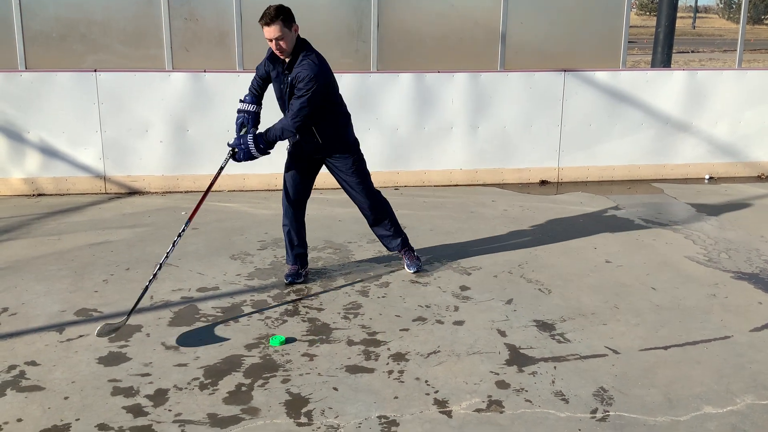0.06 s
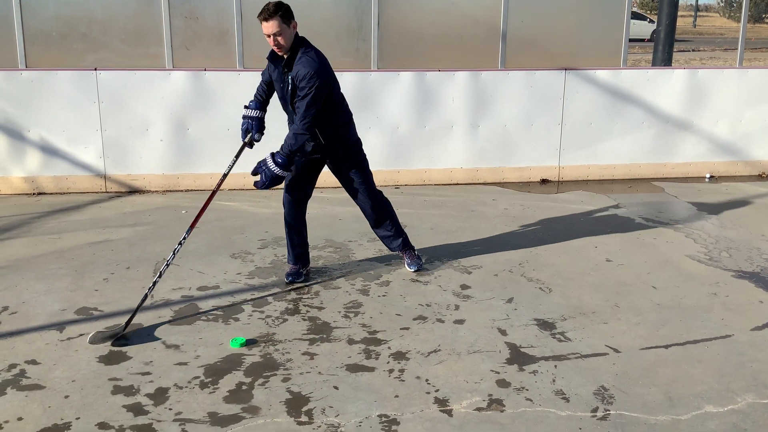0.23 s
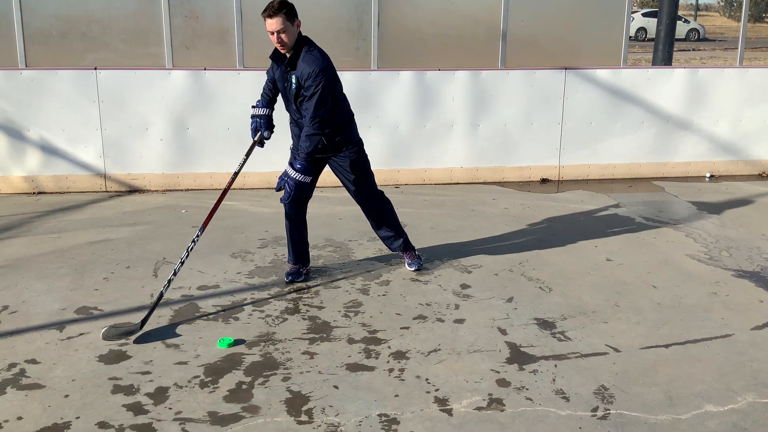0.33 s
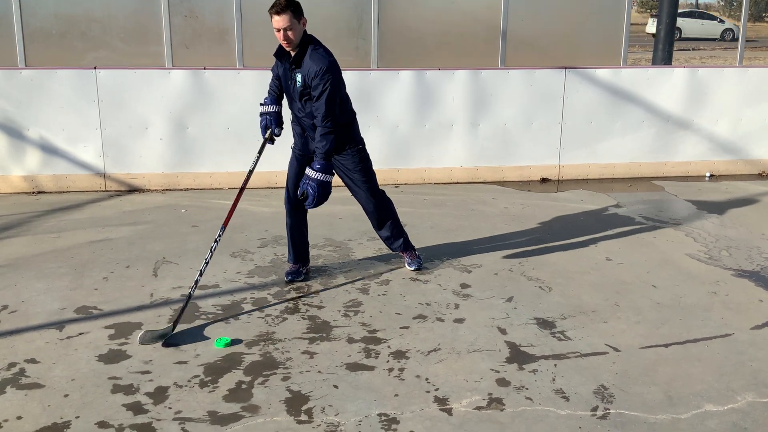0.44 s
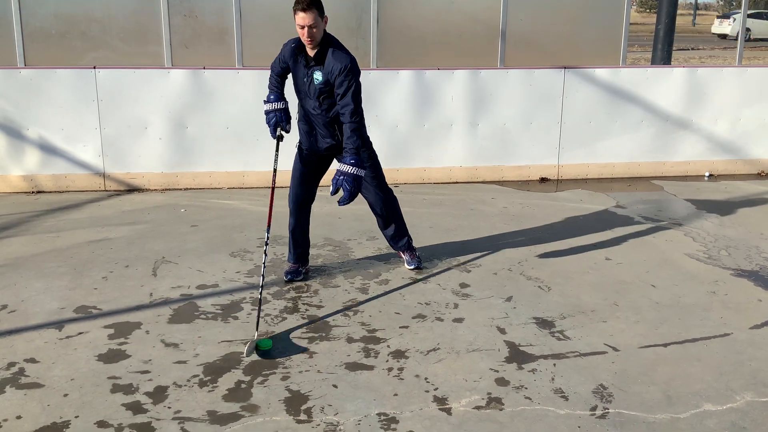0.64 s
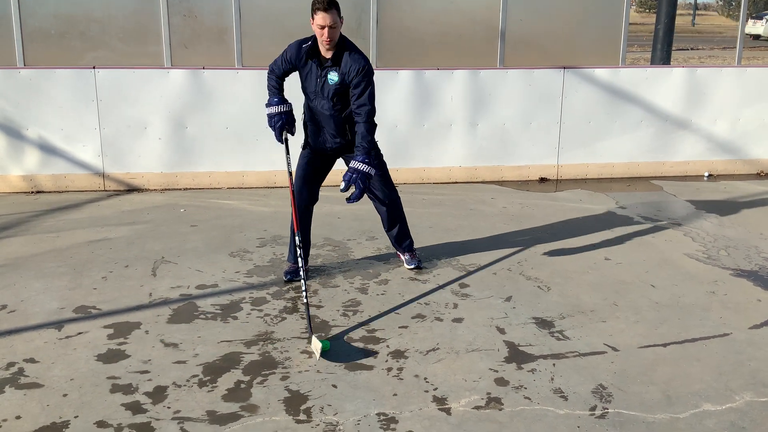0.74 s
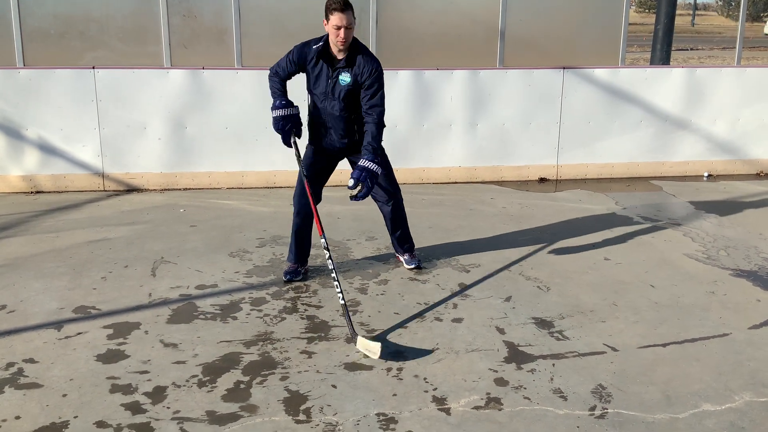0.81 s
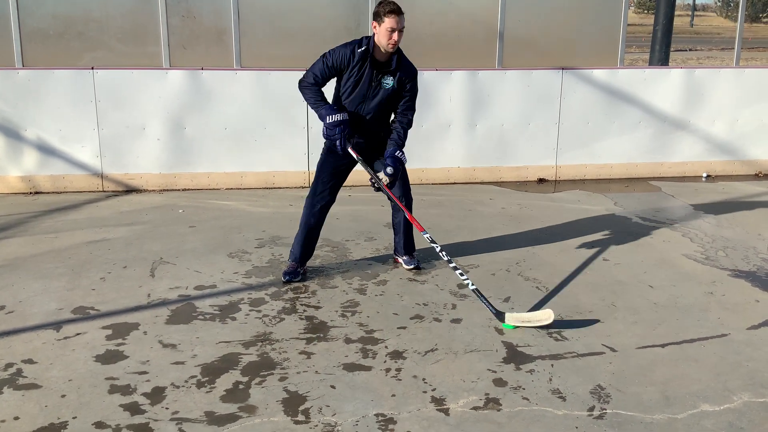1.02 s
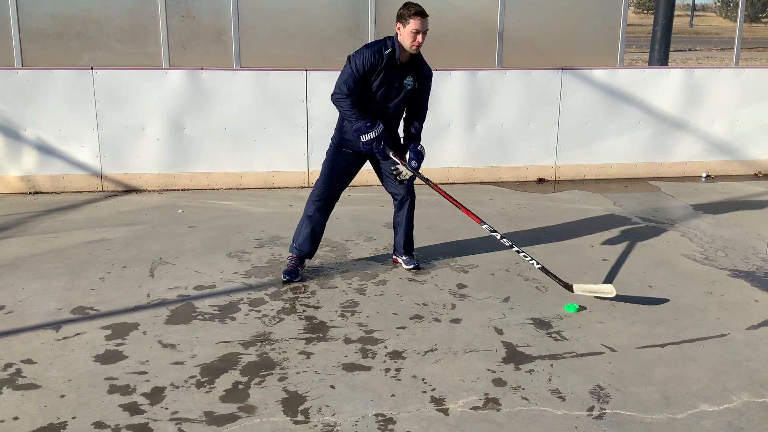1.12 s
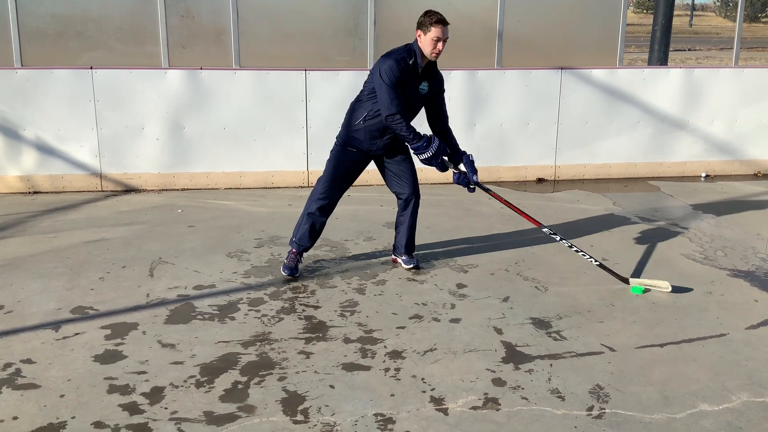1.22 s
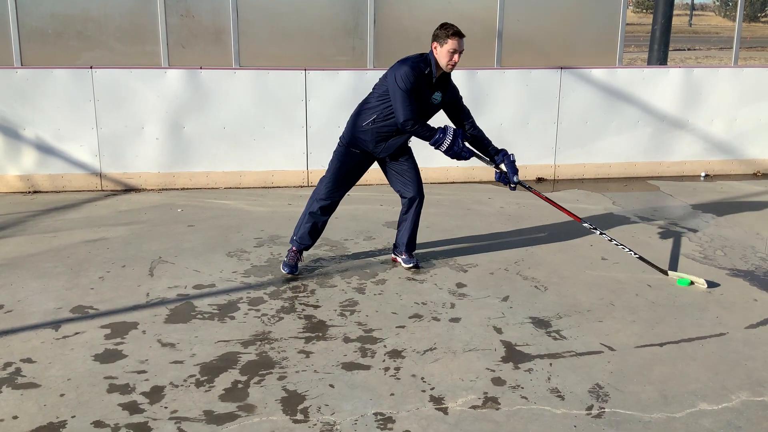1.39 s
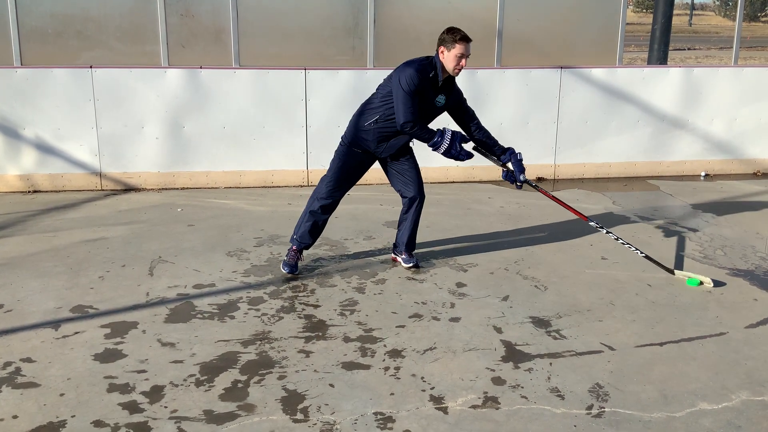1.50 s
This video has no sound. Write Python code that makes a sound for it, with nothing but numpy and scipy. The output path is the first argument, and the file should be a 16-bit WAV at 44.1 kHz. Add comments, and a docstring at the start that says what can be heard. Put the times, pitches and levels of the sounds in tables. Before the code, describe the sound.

Dry, short hockey stick taps on an outdoor concrete rink, with light touches and brief scraping

```python
"""Hockey stick on an outdoor rink

A hockey stick taps the concrete and a plastic ball, then drags the ball across.
Each tap rings the blade briefly and crushes grit; the boards slap it back and the rink rings on faintly.
The sliding blade scrapes as a run of tiny grain catches. A distant rumble and a soft hiss lie underneath.
The ringing is built from fading sine waves, the rest mostly from coloured noise.
The right microphone hears the treble a little earlier."""
import sys
import numpy as np
from scipy import signal
from scipy.fft import rfft, irfft, next_fast_len
from scipy.io import wavfile

SR = 44100
rng = np.random.default_rng(int(sys.argv[2]) if len(sys.argv) > 2 else 0)


def log_audio(samples):
    """Write samples as a 16-bit WAV file to the path given in sys.argv[1]."""
    # one column per channel
    frames = np.atleast_2d(samples).T
    # limit to full scale, then quantise
    limited = np.clip(frames, -1, 1)
    pcm = np.round(limited * 32767).astype(np.int16)
    wavfile.write(sys.argv[1], SR, pcm)


N = 68355  # length of the scene in samples


def amp(db):
    """Turn decibels into a gain."""
    return 10 ** (np.asarray(db) / 20)


def unit(x):
    """Scale a sound to an average (rms) strength of 1."""
    return x / np.sqrt(np.mean(x ** 2) + 1e-20)


def along(points, hz):
    """Read a curve of (pitch_hz, value) points, spacing pitch by ratio as the ear does."""
    point_hz, value = np.transpose(points)
    return np.interp(np.log(hz + 1), np.log(point_hz + 1), value)


def curve(points):
    """Turn (time_s, value) points into one value per sample."""
    return np.interp(np.arange(N) / SR, *np.transpose(points))


def filtered(x, response):
    """Change the strength or phase of each pitch by a given response."""
    size = x.shape[-1]
    padded = next_fast_len(size + SR // 8)  # spare room keeps the end from wrapping onto the start
    spectrum = rfft(x, padded) * response(np.fft.rfftfreq(padded, 1 / SR))
    return irfft(spectrum, padded)[..., :size]


def cut(x, hz, kind, order):
    """Remove the pitches above ("low") or below ("high") a limit."""
    sections = signal.butter(order, min(hz, SR / 3), kind, fs=SR, output="sos")
    return signal.sosfilt(sections, x)


def noise(size, colour, alike):
    """Coloured stereo noise of rms 1: more shared "mid" makes left and right more alike."""
    def mid_and_side(hz):
        turn = np.arccos(np.clip(along(alike, hz), -1, 1)) / 2
        return amp(along(colour, hz)) * [np.cos(turn), np.sin(turn)]

    mid, side = filtered(rng.standard_normal((2, size)), mid_and_side)
    return unit(np.array([mid + side, mid - side]))


def add(track, start_s, sound):
    """Mix a sound into the track from its start time."""
    part = track[:, max(round(start_s * SR), 0):][:, :sound.shape[-1]]
    part += sound[..., :part.shape[-1]]


# colour of the distant rumble: pitch_hz, level_db
RUMBLE_COLOUR = [(25, -3), (70, -3), (180, -4.5), (400, -14.5), (540, -9.5), (680, -19.5), (1000, -16),
                 (1500, -31), (2300, -28), (3500, -44.5), (7000, -58)]
# loudness of the rumble over time: time_s, level_db
RUMBLE_LEVEL = [(.35, -46.5), (.75, -47.5)]
# how alike the rumble is left and right: pitch_hz, likeness (1 = identical)
RUMBLE_ALIKE = [(60, 1), (200, 1), (600, 0.83), (2000, 0.48)]
# colour of the soft hiss: pitch_hz, level_db
HISS_COLOUR = [(1500, 4.5), (3500, -3), (5300, 3.5), (6200, 0.5), (7300, -8.5), (8900, 6.5), (10200, -4.5),
               (11500, -4), (12900, 7.5), (14500, -12), (16000, -32)]
# rise and fall of the hiss, before a fixed lift: time_s, level_db
HISS_LEVEL = [(0.0, -58), (0.098, -53.5), (0.254, -57.5), (0.478, -78), (0.604, -48), (0.672, -51.5),
              (1.04, -55.5), (1.216, -48.5), (1.308, -51.5), (1.446, -55), (1.55, -70)]
HISS_LIFT_DB = 1.5


def outdoors():
    """Noise shaped into a distant rumble and a soft hiss that swells and sinks."""
    rumble = amp(curve(RUMBLE_LEVEL)) * noise(N, RUMBLE_COLOUR, RUMBLE_ALIKE)
    hiss_alike = [(1000, 0.073)]  # one point: the same small likeness at every pitch
    hiss = amp(curve(HISS_LEVEL) + HISS_LIFT_DB) * noise(N, HISS_COLOUR, hiss_alike)
    return rumble + hiss


# colour of the bending wave in the blade: pitch_hz, level_db
FLEX_COLOUR = [(150, -2.5), (380, -28), (540, 3.5), (800, 1.5), (1300, -2), (2200, -13.5), (4000, -21)]
FLEX_FRONT_HZ = 1983  # this pitch and all above it arrive first
FLEX_DELAY_S = 0.0042  # lag of the pitch two octaves below the front


def flex(size):
    """A bending pulse of peak 1: low notes travel slower, so the knock sweeps downward."""
    hz = np.fft.rfftfreq(size, 1 / SR)
    delay_s = FLEX_DELAY_S * np.maximum(np.sqrt(FLEX_FRONT_HZ / np.maximum(hz, hz[1])) - 1, 0)
    phase = 2 * np.pi * np.cumsum(delay_s) * hz[1]  # adding up delay over pitch gives phase
    pulse = irfft(amp(along(FLEX_COLOUR, hz)) * np.exp(-1j * phase), size)
    return pulse / np.abs(pulse).max()


# ringing notes (modes) of blade and shaft: pitch_hz, level_db, fade_s (time to fall 60 dB, at ring length 1)
BLADE_MODES = [(350, -10.5, 0.032), (528.3, -5, 0.046), (647, -5.5, 0.035), (855, -7, 0.038),
               (1037, -1, 0.039), (1371, 1.5, 0.021), (1488, -9, 0.028), (1900, -7, 0.026),
               (2138, -1.5, 0.021), (2554, -3, 0.021), (2825, -6, 0.031), (3767, -1.5, 0.017),
               (5100, -1.5, 0.015)]
BUILD_CYCLES = 0.16  # low modes take longer to build up
MODE_SCATTER_RAD = 0.3  # random phase spread, separate for each microphone


def blade_ring(t, ring_length):
    """Each mode of the blade is a sine wave that builds up fast and dies away."""
    ring = np.zeros((2, len(t)))
    for k, (hz, level_db, fade_s) in enumerate(BLADE_MODES):
        phase = k * np.pi / 2 + rng.normal(0, MODE_SCATTER_RAD, (2, 1))
        loudness = amp(level_db - 60 * t / (fade_s * ring_length)) * (1 - np.exp(-t * hz / BUILD_CYCLES))
        ring += loudness * np.sin(2 * np.pi * hz * t + phase)
    return ring


# how alike contact sounds are left and right: pitch_hz, likeness (1 = identical)
CONTACT_ALIKE = [(500, 0.72), (2000, 0.9), (6000, 0.22)]
# colour of the dense ringing among the modes: pitch_hz, level_db
CLACK_COLOUR = [(300, -11), (750, 6), (2100, -0.5), (3200, 0.5), (9000, -12.5)]
CLACK_DB, CLACK_FADE_S = -2, 0.025  # fade is the time to fall 60 dB, at ring length 1
CLACK_ATTACK_S = 0.00019


def clack(t, ring_length):
    """Many close, quickly damped modes together sound like a burst of noise."""
    fade = amp(CLACK_DB - 60 * t / (CLACK_FADE_S * ring_length))
    return noise(len(t), CLACK_COLOUR, CONTACT_ALIKE) * fade * (1 - np.exp(-t / CLACK_ATTACK_S))


# colour of crushed grit: pitch_hz, level_db
GRIT_COLOUR = [(1500, -1.5), (3200, -1), (4900, 6), (6000, 0), (6800, 5), (7700, -1.5), (9300, 10.5),
               (10200, -19), (11000, 15.5), (11800, -24), (13100, 11), (15000, -3.5), (16500, -14)]
GRIT_RISE_S, GRIT_FALL_S = 0.00019, 0.0025
GRIT_CLUMP_DB, GRIT_CLUMP_S = 5, 0.0005  # unevenness, and how long each clump lasts


def grit(t):
    """Grit crushed under the blade: a very short crunch of uneven noise."""
    crush = (1 - np.exp(-t / GRIT_RISE_S)) ** 2 * np.exp(-t / GRIT_FALL_S)
    clump_gains = amp(GRIT_CLUMP_DB * np.clip(rng.standard_normal(len(t)), -2, 2))
    clumps = unit(clump_gains[(t / GRIT_CLUMP_S).astype(int)])
    return crush / crush.max() * clumps * noise(len(t), GRIT_COLOUR, CONTACT_ALIKE)


FAVOUR_DB, FAVOUR_Q = -3.5, 3.5  # extra weight near the favoured pitch, and its sharpness
MUTE_Q = 4  # sharpness of the muted notch


def blow(level_db, bright_hz, low_hz, favoured_hz, ring_length, grit_db, muted_hz=None, flex_db=None):
    """One contact rings and crunches; a firm tap also bends the blade and mutes modes still at that point."""
    t = np.arange(SR // 10) / SR
    body = blade_ring(t, ring_length) + clack(t, ring_length)
    if muted_hz:
        body = body + amp(flex_db) * flex(len(t))
        body = signal.lfilter(*signal.iirnotch(muted_hz, MUTE_Q, fs=SR), body)
    favoured = signal.lfilter(*signal.iirpeak(favoured_hz, FAVOUR_Q, fs=SR), body)
    body = body + amp(FAVOUR_DB) * favoured
    body = cut(body, bright_hz, "low", order=3)
    body = cut(body, low_hz, "high", order=1)
    return amp(level_db) * body + amp(grit_db) * grit(t)


# colour of the slap off the boards: pitch_hz, level_db
BOARDS_COLOUR = [(200, -2), (1500, 6), (4000, 11.5), (9000, -8.5), (15000, 13.5)]


def board_slap(tap):
    """The boards throw the tap back with a changed colour."""
    return filtered(tap, lambda hz: amp(along(BOARDS_COLOUR, hz)))


# how long the rink rings on: pitch_hz, fade_s (time to fall 60 dB)
RINK_FADE = [(4000, 0.99), (13000, 0.13)]
RINK_DB, RINK_BUILD_S = -14, 0.0022
SCATTER_DB, SCATTER_FADE_S = -5.5, 0.055  # fade is the time to fall 60 dB


def rink(sound):
    """Early scatter from the ground and a long faint tail between the boards."""
    # fading each pitch of a noise at its own speed makes the tail
    hz, frame_s, pieces = signal.stft(rng.standard_normal((2, SR)), SR, nperseg=256)
    fade = amp(-60 * frame_s / along(RINK_FADE, hz)[:, None])
    tail = signal.istft(pieces * fade, SR, nperseg=256)[1]
    t = np.arange(tail.shape[1]) / SR
    tail = unit(tail * (1 - np.exp(-t / RINK_BUILD_S)))
    scatter = unit(rng.standard_normal(tail.shape) * amp(-60 * t / SCATTER_FADE_S))
    echoes = (amp(RINK_DB) * tail + amp(SCATTER_DB) * scatter) / np.sqrt(len(t))
    return signal.fftconvolve(sound, echoes, axes=1)


# firm blade taps: start_s, level_db (of the ringing), bright_hz (treble limit), low_hz (bass limit),
# favoured_hz and muted_hz (at the point struck), ring_length (ratio), flex_db (beside the ringing),
# grit_db, echo_delay_s, echo_db and rink_db (both beside the tap)
TAPS = [(.2410, -20, 1200, 690, 945, 1282, 1.2, -13, -68, 0.018, -15.5, -5.5),
        (0.4173, -20, 2150, 650, 1000, 2390, 0.94, -4.5, -50.5, 0.02, -12, -3),
        (0.5516, -12, 2270, 850, 1220, 3170, 0.92, -7.5, -13.5, .0205, -15.5, -3.5),
        (1.1908, -21.5, 4900, 380, 1620, 1130, 0.84, -5.5, -33, 0.016, -10, 0.5),
        (1.2696, -14.5, 3030, 260, 1340, 3580, 0.7, 5.5, -20, 0.017, -19, -11)]
# light touches of ball and blade: start_s, level_db (of the ringing), bright_hz, favoured_hz, grit_db
TOUCHES = [(.563, -35, 3000, 1890, -35), (.620, -32.5, 1850, 1080, -43), (1.0009, -38, 5500, 1430, -36),
           (1.016, -38, 6500, 5460, -45), (1.033, -45.5, 5000, 3860, -41), (1.045, -44, 5000, 4020, -41),
           (1.2031, -30.5, 6160, 4770, -27), (1.312, -32, 1540, 590, -38.5),
           (1.477, -45, 3370, 1470, -50.5)]
TOUCH_LOW_SHARE, TOUCH_RING = 0.3, 0.89  # bass limit over favoured pitch; ring length ratio


def stick():
    """Taps with their slap off the boards and rink echo, and the lighter touches between them."""
    out = np.zeros((2, N))
    for (start_s, level_db, bright_hz, low_hz, favoured_hz, muted_hz, ring_length, flex_db,
         grit_db, echo_delay_s, echo_db, rink_db) in TAPS:
        tap = blow(level_db, bright_hz, low_hz, favoured_hz, ring_length, grit_db, muted_hz, flex_db)
        add(out, start_s, tap)
        add(out, start_s + echo_delay_s, amp(echo_db) * board_slap(tap))
        add(out, start_s, amp(rink_db) * rink(tap))
    for start_s, level_db, bright_hz, favoured_hz, grit_db in TOUCHES:
        low_hz = TOUCH_LOW_SHARE * favoured_hz
        add(out, start_s, blow(level_db, bright_hz, low_hz, favoured_hz, TOUCH_RING, grit_db))
    return out


# slides of the blade on concrete: start_s, length_s, level_db
SCRAPES = [(0.416, 0.14, -50.5), (1.003, 0.062, -51.5), (1.377, 0.078, -52)]
# colour of the scrape: pitch_hz, level_db
SCRAPE_COLOUR = [(400, -20), (2400, 14.5), (3200, 1.5), (4000, 7.5), (7500, 3.5), (16000, -8)]
GRAINS_PER_S, GRAIN_SPREAD_DB = 1200, 4


def scraping():
    """The sliding blade catches on sand grains of uneven size, each catch dying away like crushed grit."""
    out = np.zeros((2, N))
    t = np.arange(N) / SR
    grain_sizes = amp(GRAIN_SPREAD_DB * np.clip(rng.standard_normal(N), -2, 2))
    catches = (rng.random(N) < GRAINS_PER_S / SR) * grain_sizes
    fading_catches = signal.lfilter([1], [1, -np.exp(-1 / (GRIT_FALL_S * SR))], catches)
    grains = unit(fading_catches * noise(N, SCRAPE_COLOUR, CONTACT_ALIKE))
    for start_s, length_s, level_db in SCRAPES:
        progress = np.clip((t - start_s) / length_s, 0, 1)
        swell = np.sqrt(np.abs(np.sin(np.pi * progress)))  # rises, then falls
        out += amp(level_db) * grains * swell
    return out


# loudness difference between the microphones: pitch_hz, left_minus_right_db
BALANCE = [(60, 0), (200, -2.5), (550, -3.5), (1100, 0), (2200, -2.5), (3700, -2), (5000, 2.5), (7500, 4),
           (12000, -0.5)]
# phase by which the right microphone leads: pitch_hz, lead_rad
RIGHT_LEAD = [(0, 0), (250, -.3), (450, -.8), (600, -2), (780, -4.3), (950, -4.9), (1120, -4.3),
              (1300, -2.1), (1600, -.8), (3000, 7.3), (16000, 71)]


def microphones(sound):
    """Left and right differ in loudness and timing at each pitch."""
    def response(hz):
        sides = np.array([[0.5], [-0.5]])  # half the difference goes to each side
        lead_rad = np.interp(hz, *np.transpose(RIGHT_LEAD))
        hold_back_left = np.exp(-1j * lead_rad * np.array([[1], [0]]))
        return amp(sides * along(BALANCE, hz)) * hold_back_left

    return filtered(sound, response)


def scene():
    """All sources together, as the two microphones hear them."""
    return microphones(outdoors() + stick() + scraping())


TOP_HZ = 16000


def record(dry):
    """The recorder keeps almost nothing above its band limit."""
    return filtered(dry, lambda hz: 1 / np.sqrt(1 + (hz / TOP_HZ) ** 120))


dry = scene()
out = record(dry)
log_audio(out)
```